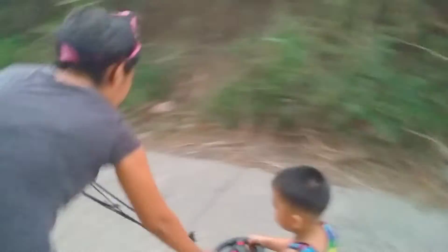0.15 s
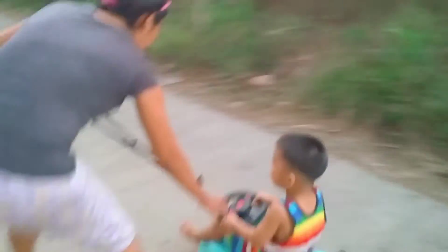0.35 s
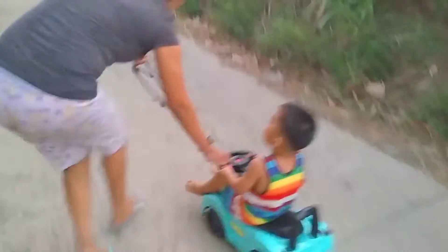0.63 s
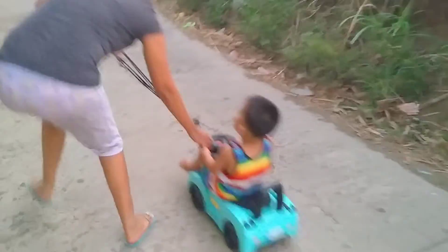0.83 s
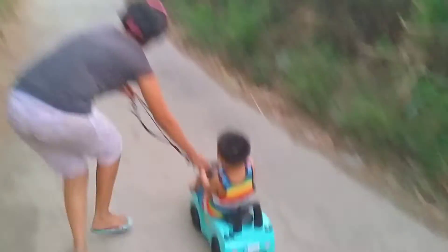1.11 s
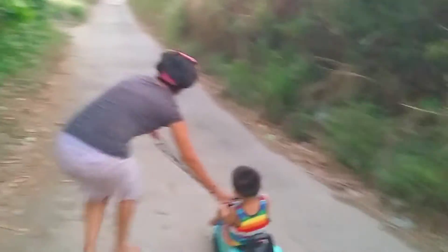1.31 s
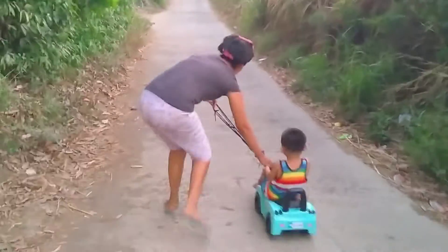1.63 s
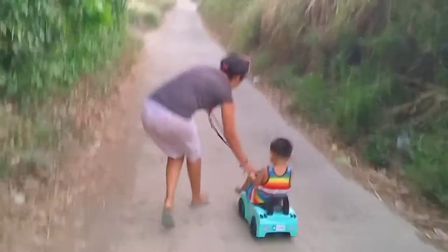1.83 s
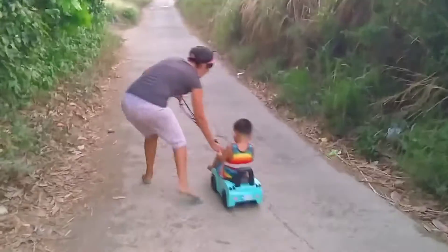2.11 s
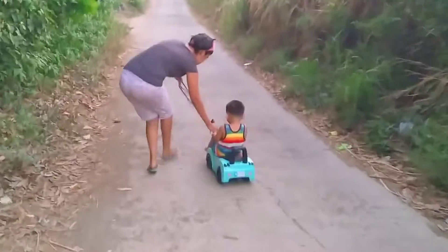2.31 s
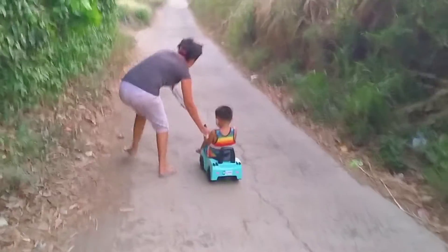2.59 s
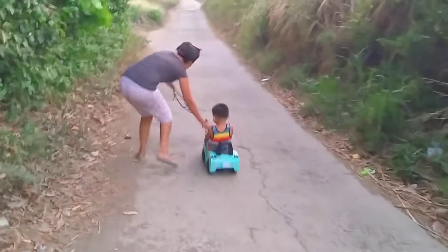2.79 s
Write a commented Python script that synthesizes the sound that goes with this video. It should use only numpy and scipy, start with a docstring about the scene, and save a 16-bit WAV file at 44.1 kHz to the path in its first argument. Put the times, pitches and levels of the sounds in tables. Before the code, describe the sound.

Hard plastic toy car wheels rumble and rattle on rough concrete, strongest at the start. Heavy hollow bumps cluster around 0.15-0.2 s, then a loud sandal slap at 0.2 s and a softer flapping one at 0.8 s. Sharp clacks stand out at 0.33 and 1.7 s; a tiny axle squeak comes near 1 s. Rolling fades with distance, sparser after 2.3 s, over soft outdoor noise.

```python
"""On a rough concrete lane, a hollow plastic ride-on car is pushed away.
Random grit clicks under the hard wheels make the shell rumble and the wheels rattle.
Bumps thump the shell with short swelling tones, loose parts clack, and an axle squeaks once.
The sandals of the walker beside it slap twice, as clicks ringing the sole.
Soft outdoor noise and a faint low hum lie behind."""
import sys
import numpy as np
from scipy import signal
from scipy.fft import rfft, irfft
from scipy.io import wavfile

SR = 44100
rng = np.random.default_rng(int(sys.argv[2]) if len(sys.argv) > 2 else 0)


def master_out(mix):
    """Clip the mix to full scale and print it as 16-bit PCM to the path in sys.argv[1]."""
    frames = np.transpose(np.atleast_2d(mix))
    ceiling = np.clip(frames, -1, 1)
    pcm = np.round(ceiling * 32767).astype(np.int16)
    wavfile.write(sys.argv[1], SR, pcm)


def boost_factor(decibels):
    """Convert a level in decibels to a linear amplitude factor."""
    exponent = np.asarray(decibels, float) / 20
    return 10 ** exponent


N = 130095  # length in samples

# Rolling as the car moves away, before the trims in rolling().
# Each row: time in seconds, rumble level in dB, level of the rattle above it in pitch in dB.
ROLL = [(0.0, -30, -37), (0.22, -33, -38), (0.44, -38, -40.5), (0.67, -38.5, -40.5), (0.94, -39, -38.5),
        (1.14, -39.5, -40), (1.48, -42, -41.5), (1.85, -43.5, -40), (2.06, -41.5, -42), (2.32, -43.5, -41),
        (2.64, -48, -43), (2.95, -48, -44.5)]
# Resonances of the hollow shell. Each row: pitch in Hz, width in Hz, relative level in dB.
SHELL = [(163.2, 52.8, -3.5), (203.3, 37.7, 1.5), (238.7, 35.8, -0.5), (305, 53.8, -3), (358.7, 83, -7),
         (458, 84, -15)]
# Resonances of wheels and axles. Each row: pitch in Hz, width in Hz, relative level in dB.
WHEELS = [(493.4, 24, 2), (671, 296, 1.5), (818, 140, 3.5), (935, 95, 0), (1248, 140, -0.5),
          (1535, 267, -1), (1900, 284, -0.5), (2124, 357, -2.5), (2867, 220, -6.5), (3120, 264, -4.5),
          (3900, 570, -3.5), (4545, 360, -4.5), (4860, 370, -5.5), (5840, 1380, -10.5), (6930, 260, -25.5)]
# Bumps under a wheel. Each row: start in seconds, thump level in dB, pitch in Hz,
# rattle against thump in dB, length in seconds.
BUMPS = [(0.017, -38, 220, -4, 0.0085), (0.086, -35, 220, -25, 0.016), (0.15, -19, 267, -13, 0.01),
         (0.163, -22.5, 234, -9, 0.014), (0.186, -22.5, 240, -20, 0.0096), (0.282, -28.5, 323, -5, 0.038),
         (0.307, -29.5, 377, -11, 0.035), (0.337, -33.5, 351, -29, 0.022), (0.405, -36.5, 183, -18, 0.022),
         (0.474, -34.5, 177, -9, 0.029), (0.523, -30, 206, -10, 0.033), (0.551, -29.5, 220, -32, 0.037),
         (0.59, -28, 200, -17, 0.012), (0.739, -24.5, 210, -4.5, 0.038), (0.804, -33.5, 198, -3.5, 0.02),
         (0.883, -27, 217, -12, 0.007), (0.934, -29.5, 237, -20, 0.014), (0.594, -31.5, 414, -23, 0.015),
         (1.113, -30, 221, -5.5, 0.018), (1.147, -27.5, 543, -23.5, 0.0082), (1.15, -26, 211, -12, 0.018),
         (1.182, -33, 214.5, -23, 0.091), (1.282, -29, 236, -4.5, 0.026), (1.316, -30.5, 211, -27, 0.028),
         (1.428, -34.5, 216, -4, 0.024), (1.562, -25, 196, -19, 0.023), (1.694, -31.5, 223, -1.5, 0.017),
         (1.77, -35.5, 603, -14, 0.0046), (1.793, -38, 600, -17.5, 0.011),
         (1.889, -31.5, 211, -13.5, 0.031), (1.979, -31, 223, -7, 0.044), (2.027, -29.5, 184, -13, 0.021),
         (2.207, -33, 229, -4, 0.031), (2.25, -27, 220, -21, 0.015), (2.293, -39.5, 232, -4, 0.054),
         (2.416, -32, 224, -9, 0.022), (2.589, -42, 217, -19, 0.032), (2.856, -34, 210, -13, 0.01),
         (2.906, -34, 186, -5.5, 0.013)]
# Clacks of loose parts. Each row: start in seconds, peak level in dB, pitch in Hz,
# length in seconds, broad crack against ring in dB.
CLACKS = [(0.1414, -24, 1370, 0.0075, 10), (0.156, -21.5, 1580, 0.0054, 1), (0.294, -26, 3000, 0.0088, 15),
          (0.3316, -17, 5430, 0.0055, -5), (0.402, -31.5, 1520, 0.0045, 7), (0.593, -33, 1840, 0.0037, 16),
          (0.7416, -39, 2400, 0.0065, 7), (0.951, -34, 1310, 0.0033, 6), (0.972, -31, 3940, 0.0045, 3),
          (1.074, -28.5, 1460, 0.0068, 7), (1.102, -29.5, 1900, 0.011, 12),
          (1.147, -37.5, 1730, 0.0068, -5), (1.266, -30, 1390, 0.011, 8.5), (1.432, -41, 1590, 0.0034, 6),
          (1.449, -30.5, 1590, 0.0037, 17), (1.503, -33.5, 1470, 0.0057, 3),
          (1.561, -28.5, 1710, 0.0071, -2.5), (1.665, -35.5, 4020, 0.011, 9),
          (1.7082, -17.5, 3900, 0.0084, -0.5), (1.7714, -33, 3120, 0.0037, -10),
          (1.793, -33.5, 1490, 0.0038, 7.5), (1.8296, -30.5, 4000, 0.0065, -3),
          (1.932, -25, 1570, 0.0042, -3), (1.947, -27, 1560, 0.0037, 6), (1.9985, -27.5, 4410, 0.013, -3.5),
          (2.018, -30, 1630, 0.0095, 7), (2.2058, -29, 3830, 0.0064, -14), (2.782, -31, 1520, 0.0061, 4),
          (2.849, -38, 1440, 0.0039, 3)]
# Sandal slaps. Each row: start in seconds, peak level in dB,
# treble limit of the soft contact in Hz, flaps against slap in dB.
SLAPS = [(.2087, -8.5, 6000, -4), (.7795, -15, 3600, 2)]
# Ringing of the sandal. Each row: pitch in Hz, relative level in dB, time to fall by 60 dB in seconds.
SANDAL_MODES = [(1100, -14, .010), (1750, -5, .008), (2150, 0, .009), (2900, -8, .007), (3600, -7, .008),
                (4400, -15, .005), (5600, -14, .005)]
# First touch, slap and flaps. Each row: delay in seconds, relative level in dB.
SLAP_TOUCHES = [(0.0, -10), (.0012, 0), (.0023, -3), (.0032, -8), (.013, -10), (.0175, -6), (.023, -12),
                (.03, -12), (.038, -14)]
# Colour of outdoor air and microphone noise. Each row: frequency in Hz, relative level in dB per Hz.
AIR_COLOUR = [(24, -75), (40, -41.5), (81, -29.5), (215, 9), (428, -19.5), (697, -8), (2630, -32.5),
              (3750, -30), (5840, -24), (7970, -63), (10400, -87), (17500, -120)]


def rms_one(x):
    """Scale to an average strength (rms) of 1."""
    return x / np.sqrt(np.mean(x ** 2) + 1e-20)


def drift(rate_hz):
    """Slow random wandering with rms 1: noise smoothed twice below the given rate."""
    r = np.exp(-2 * np.pi * rate_hz / SR)
    smooth = signal.lfilter([1], [1, -2 * r, r * r], rng.standard_normal(N + SR))
    return rms_one(smooth[SR:])  # skip the filter's first second


def resonance(x, hz, width_hz):
    """Two-pole resonance that passes its own pitch at gain 1."""
    r = np.exp(-np.pi * width_hz / SR)
    top = [(1 - r * r) / 2, 0, (r * r - 1) / 2]
    bottom = [1, -2 * r * np.cos(2 * np.pi * hz / SR), r * r]
    return signal.lfilter(top, bottom, x + 1e-18)


def ring(x, hz, t60):
    """A click of height 1 starts a dying sine of height 1."""
    r = boost_factor(-60 / (t60 * SR))
    w = 2 * np.pi * hz / SR
    return signal.lfilter([0, np.sin(w)], [1, -2 * r * np.cos(w), r * r], x + 1e-18)


def body(x, peaks):
    """An object as resonances side by side, with alternating signs."""
    return sum((-1) ** k * boost_factor(db) * resonance(x, hz, width_hz)
               for k, (hz, width_hz, db) in enumerate(peaks))


def dull(x, hz):
    """Soften everything above the given frequency with a gentle low-pass."""
    return signal.lfilter(*signal.butter(1, hz, fs=SR), x)


def grains(per_s, spread_db):
    """Clicks at random times, with random signs and uneven sizes."""
    sizes = boost_factor(spread_db * np.minimum(rng.exponential(1, N), 5)) * rng.choice([-1, 1], N)
    return sizes * (rng.random(N) < per_s / SR)


def dying(start_s, tau_s):
    """Envelope that jumps to 1 and dies away exponentially."""
    t = np.arange(N) / SR - start_s
    return np.exp(-np.maximum(t, 0) / tau_s) * (t >= 0)


def add(out, start_s, x):
    """Mix x into out from the given time."""
    i = int(start_s * SR)
    out[i:i + len(x)] += x[:len(out) - i]


def rolling():
    """Coarse grit excites the shell, finer grit the wheels; both shake together, and bumps add rattle."""
    rumble_trim_db, rattle_trim_db = -0.5, -5.5
    rumble_shake_db, rattle_shake_db, crunch_db = 2.6, 1.2, 3
    s, rumble_db, rattle_db = np.transpose(ROLL)
    t = np.arange(N) / SR
    rumble_level = boost_factor(np.interp(t, s, rumble_db) + rumble_trim_db)
    shake = drift(25)

    coarse = boost_factor(rumble_shake_db * shake) * grains(per_s=600, spread_db=2.0)
    rumble = rms_one(body(coarse, SHELL))

    grit = rms_one(grains(per_s=3000, spread_db=2.5))
    unit = np.std(body(grit, WHEELS))
    # larger stones tick dully through the grit
    pebbles = boost_factor(-13) * rms_one(dull(grains(per_s=120, spread_db=5.2), 1000))
    crunch = np.maximum(drift(45), 0) - .4  # rough patches come in clusters
    rattle_level = boost_factor(np.interp(t, s, rattle_db) + rattle_trim_db
                       + rattle_shake_db * shake + crunch_db * crunch)

    jolts = sum(boost_factor(db + rattle_rel_db) * dying(at, 0.023) for at, db, _, rattle_rel_db, _ in BUMPS)
    # reversed grit gives the bumps a rattle of their own, duller than the rolling grit
    bump_rattle = dull(jolts * grit[::-1], 2010)
    drive = rattle_level * (grit + pebbles) + bump_rattle
    return rumble_level * rumble + body(drive, WHEELS) / unit


def bumps():
    """The shell swells briefly at each bump's pitch, and its upper modes and the lowest wheel modes stir."""
    rise, upper_db = .25, -12.5  # rise as a share of the length
    out = np.zeros(N)
    t = np.arange(SR // 8) / SR
    noises = rng.standard_normal((len(BUMPS), len(t)))
    for (s, db, hz, _, length), noise in zip(BUMPS, noises):
        u = t / length
        swell = np.minimum(u / rise, 1) * np.exp(-u ** 2)
        tone = np.sin(2 * np.pi * hz * t + 3 * noise[0])  # random starting phase
        upper = rms_one(body(noise, SHELL[3:] + WHEELS[:2]))
        add(out, s, boost_factor(db) * swell * (tone + boost_factor(upper_db) * upper))
    return out


def clacks():
    """A short spatter of contacts cracks broadly and rings one part, which keeps chattering faintly."""
    rise = .2  # share of the length
    ring_cycles, pure_from_db = 12, 10  # a crack further than this under the ring leaves a clear tone
    crack_octaves = 1.05  # at this distance from the pitch the crack is 3 dB weaker
    tail_db, tail_s = -9, .022
    out = np.zeros(N)
    t = np.arange(SR // 8) / SR
    noises = rng.standard_normal((len(CLACKS), len(t)))
    for (s, db, hz, length, crack_db), noise in zip(CLACKS, noises):
        swell = np.minimum(t / (rise * length), 1) * np.exp(-(t / length) ** 2)
        spatter = noise * swell
        purity = max(boost_factor(-crack_db - pure_from_db) - 1, 0)
        pure = swell * purity * np.sin(2 * np.pi * hz * t)
        chatter = noise * boost_factor(tail_db) * np.exp(-t / tail_s)
        part = resonance(pure + spatter + chatter, hz, hz / ring_cycles)
        # the crack stirs mainly the modes near the part's pitch
        near = [(f, width_hz, level_db - 3 * (np.log2(f / hz) / crack_octaves) ** 2)
                for f, width_hz, level_db in WHEELS]
        crack = body(spatter + chatter / 2, near)
        clack = part / np.abs(part).max() + boost_factor(crack_db) * crack / np.abs(crack).max()
        add(out, s, boost_factor(db) * clack / np.abs(clack).max())
    return out


def sandals():
    """Clicks of a first touch, a sharp double slap and flaps ring the sole; gritty noise makes a scuff."""
    scuff_hz, scuff_width_hz, scuff_db, scuff_s = 1900, 900, -21, 0.017
    thin_hz = 600  # the thin sole gives little bass
    flap_db_per_octave = 9  # flaps stir mainly the modes near the scuff pitch
    scuff = resonance(grains(per_s=3700, spread_db=1.5), scuff_hz, scuff_width_hz)
    scuff = rms_one(resonance(scuff, scuff_hz, 2 * scuff_width_hz))
    out = np.zeros(N)
    delay, touch_db = np.transpose(SLAP_TOUCHES)
    is_flap = delay > .01
    for s, db, soft_hz, flaps_db in SLAPS:
        swell = 4 * (dying(s, scuff_s) - dying(s, scuff_s / 2))  # peaks at 1
        out += boost_factor(db + flaps_db + scuff_db) * swell * scuff
        slap = 0
        for hz, level_db, t60 in SANDAL_MODES:
            flap_level_db = flaps_db - flap_db_per_octave * abs(np.log2(hz / scuff_hz))
            uneven_db = rng.normal(0, 1, len(delay)) * (1 + 2 * is_flap)  # flaps vary more
            clicks = np.zeros(SR // 8)
            clicks[(delay * SR).astype(int)] = -boost_factor(touch_db + flap_level_db * is_flap + uneven_db)
            slap = slap + boost_factor(level_db) * ring(clicks, hz, t60)
        band = signal.butter(2, [thin_hz, soft_hz], "band", fs=SR, output="sos")
        slap = signal.sosfilt(band, slap)
        add(out, s, boost_factor(db) * slap / np.abs(slap).max())
    return out


def squeak():
    """A brief axle squeak: a rough, wavering high tone that sags in the middle."""
    start_s, length_s, pitch_hz, sag_hz, level_db = .973, .042, 5900, 150, -44
    u = np.clip((np.arange(N) / SR - start_s) / length_s, 0, 1)  # runs from 0 to 1 during the squeak
    hz = pitch_hz - sag_hz * np.sin(np.pi * u) + 110 * drift(300)
    fade = np.minimum(np.minimum(5 * u, 3 - 3 * u), 1)
    level = boost_factor(level_db + 3 * drift(200)) * fade
    return level * np.sqrt(2) * np.sin(2 * np.pi * np.cumsum(hz) / SR)


def air():
    """Outdoor air and microphone noise, made by colouring white noise, with a faint low hum."""
    noise_db, hum_hz, hum_db = -49.5, 60, -83  # rms levels
    hz, db = np.transpose(AIR_COLOUR)
    f = np.fft.rfftfreq(N, 1 / SR) + 1  # the 1 keeps the logarithm finite
    colour = boost_factor(np.interp(np.log(f), np.log(hz), db))
    noise = irfft(rfft(rng.standard_normal(N)) * colour, N)
    hum = np.sqrt(2) * np.sin(2 * np.pi * hum_hz * np.arange(N) / SR)
    return boost_factor(noise_db) * rms_one(noise) + boost_factor(hum_db) * hum


def scene():
    """The near sources lose their deepest bass in the small microphone; air is added in full."""
    near = rolling() + bumps() + clacks() + sandals() + squeak()
    bass_cut = signal.butter(3, 144, "high", fs=SR, output="sos")
    return (signal.sosfilt(bass_cut, near) + air())[None]  # one channel


def top_cut(x):
    """Nothing passes above the cut-off."""
    return signal.sosfilt(signal.butter(12, 8120, fs=SR, output="sos"), x)


def record(dry):
    """The treble is rolled off, then cut steeply, and faint hiss is added."""
    roll_off = signal.butter(6, 6000, fs=SR, output="sos")
    steep_cut = signal.cheby2(8, 40, 8550, fs=SR, output="sos")  # 40 dB down from 8550 Hz
    mix = signal.sosfilt(steep_cut, signal.sosfilt(roll_off, dry))
    mix = mix + boost_factor(-83) * rng.standard_normal(mix.shape)
    return top_cut(mix)


dry = scene()
out = record(dry)
master_out(out)
```